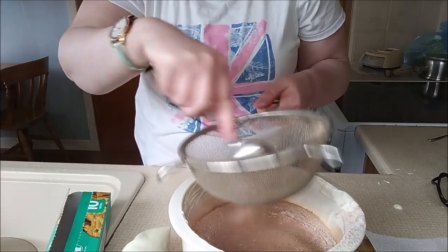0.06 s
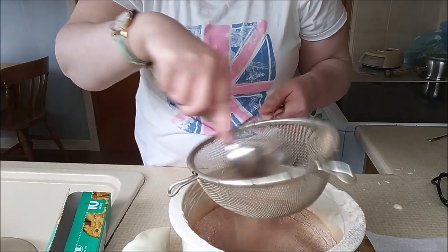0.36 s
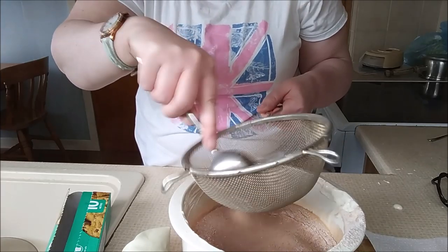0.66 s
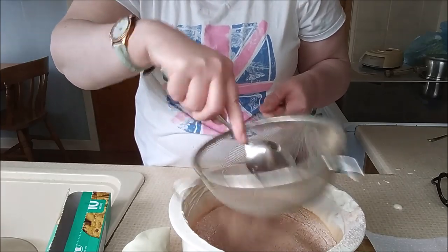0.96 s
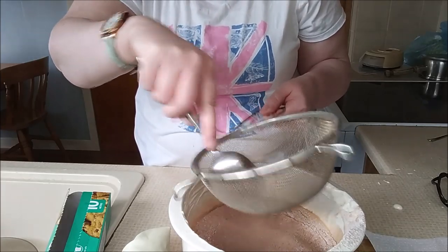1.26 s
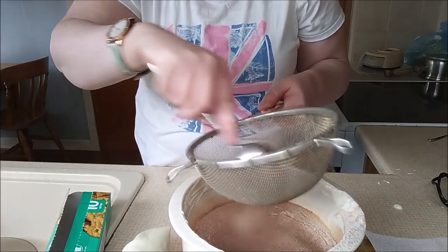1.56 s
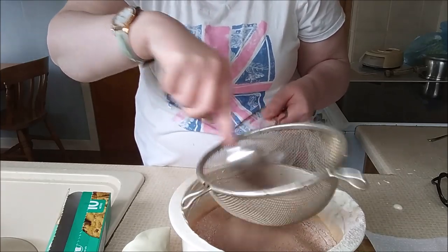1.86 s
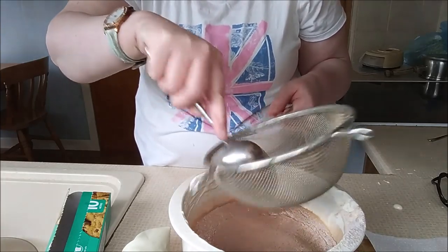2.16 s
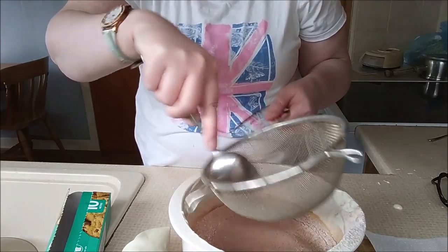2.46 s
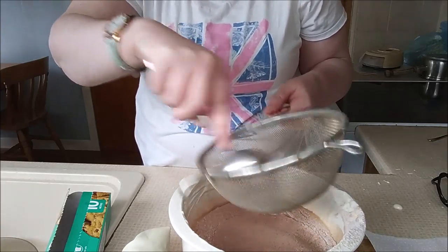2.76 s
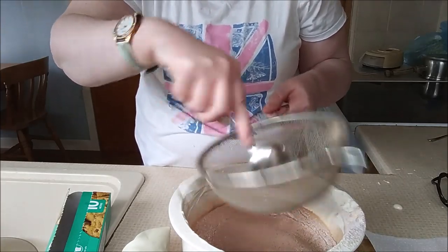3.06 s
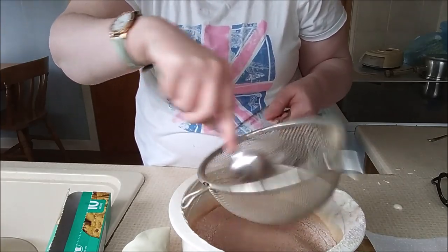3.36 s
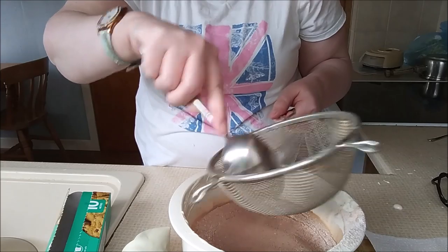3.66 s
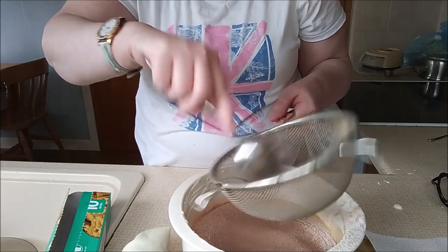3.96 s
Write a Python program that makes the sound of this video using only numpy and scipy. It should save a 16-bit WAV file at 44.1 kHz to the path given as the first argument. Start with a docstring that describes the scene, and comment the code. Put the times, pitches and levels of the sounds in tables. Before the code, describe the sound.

A metal spoon scrapes back and forth in a wire sieve, about nine strokes a second, each a bright rasp with a high ring. Near 2.1 seconds it rests with light touches, then resumes at 2.4. It stops at 3.6 with small clinks, and one last stroke comes at 3.9. The small kitchen adds a short echo, over a faint low electrical hum.

```python
"""A metal spoon rubs to and fro in a wire sieve over a bowl, about nine strokes a second. Its edge trips
over the wires: dense clicks rasp in the mesh, flex the basket and make the spoon ring. Near 2.1 s it rests
briefly, with light touches; the strokes resume at 2.4 s, rest again at 3.6 s, and one last comes at 3.9 s.
Throughout, a small kitchen answers, over a low mains hum and still air."""
import sys
import numpy as np
from scipy import signal
from scipy.fft import rfft, irfft, next_fast_len
from scipy.io import wavfile

SR = 44100
rng = np.random.default_rng(int(sys.argv[2]) if len(sys.argv) > 2 else 0)


def to_wav(sig):
    """Store sig (one row per channel, or 1-D mono) as 16-bit WAV at the path in sys.argv[1].

    Samples outside -1..1 are clipped; the rate is SR.
    """
    pcm = np.clip(np.atleast_2d(sig), -1, 1) * 32767
    pcm = np.round(pcm).astype(np.int16)
    wavfile.write(sys.argv[1], SR, pcm.T)  # frames by channels


N = 176400

RELEASE_S, OVERRUN_S = .04, .01  # the spoon slows and slides on a little
TOP_BACK_DB, TOP_FORWARD_DB = -50.5, -56  # the spoon's highest rings
# Each row: start, length and attack in seconds, way (back or forward), levels in dB of basket, frame,
# mesh, spoon's main ring and its upper rings, basket's note in Hz.
STROKES = [ (0, 0.059, 0.01, "back", -79, -56, -44, -51, -48, 1255),
           (0.092, 0.096, 0.041, "forward", -69, -50, -43.5, -42.5, -51.5, 1194),
           (.213, 0.085, 0.033, "back", -82, -57, -45.5, -45.5, -55, 888),
           (0.326, 0.076, 0.036, "forward", -64.5, -48, -41.5, -46, -52, 1132),
           (0.442, 0.079, 0.046, "back", -66, -54.5, -44, -43, -53.5, 1127),
           (0.54, 0.072, 0.041, "forward", -66.5, -47, -43, -41, -50, 1270),
           (0.66, 0.069, .048, "back", -68.5, -50, -43.5, -39, -51, 1354),
           (0.756, .082, 0.041, "forward", -63, -48.5, -43, -48.5, -51, 917),
           (0.874, .074, 0.033, "back", -69, -50, -43, -43.5, -60, 883),
           (0.972, 0.088, 0.039, "forward", -57, -47, -40.5, -41.5, -52, 1144),
           (1.091, 0.065, .038, "back", -69.5, -54.5, -44, -43, -51, 1107),
           (1.175, 0.083, 0.029, "forward", -61.5, -50.5, -42.5, -40.5, -57, 1324),
           (1.298, 0.065, 0.039, "back", -66, -53, -42.5, -46.5, -49, 1094),
           (1.395, 0.08, 0.038, "forward", -60.5, -47.5, -43, -46, -60, 1129),
           (1.51, 0.072, 0.042, "back", -67, -54, -45, -43.5, -61, 1054),
           (1.613, 0.085, 0.022, "forward", -54.5, -45.5, -41.5, -41.5, -48, 1130),
           (1.734, 0.062, 0.038, "back", -62.5, -52.5, -42.5, -43.5, -48.5, 1145),
           (1.833, 0.073, .017, "forward", -53.5, -45, -41, -45, -48, 1128),
           (1.955, 0.06, 0.047, "back", -63, -52, -44, -37, -46, 1203),
           (2.044, 0.07, 0.018, "forward", -52.5, -44.5, -40.5, -37, -40, 1195),
           (2.375, 0.087, 0.063, "forward", -61, -50.5, -44.5, -43, -48.5, 865),
           (2.502, .095, 0.04, "back", -75, -56, -44.5, -54.5, -53, 980),
           (2.616, 0.088, 0.041, "forward", -54, -44.5, -42, -42, -47.5, 1150),
           (2.75, 0.075, 0.067, "back", -68, -55.5, -44, -43, -48, 1125),
           (2.852, 0.098, 0.034, "forward", -57.5, -45, -42, -42.5, -47.5, 1140),
           (2.975, 0.075, 0.074, "back", -60.5, -52, -40.5, -45, -46, 1422),
           (3.088, 0.096, 0.029, "forward", -51, -43.5, -39, -46, -47, 1184),
           (3.22, 0.056, 0.042, "back", -60, -49, -40.5, -37.5, -48.5, 1212),
           (3.315, 0.087, 0.036, "forward", -54.5, -46, -40.5, -48, -49, 1195),
           (3.446, 0.061, 0.034, "back", -63.5, -49.5, -43.5, -42, -58, 1172),
           (3.517, 0.081, 0.021, "forward", -61.5, -51, -45.5, -39.5, -51, 1078),
           (3.919, 0.049, 0.0052, "forward", -67.5, -54, -45.5, -63, -68, 1230)]
def strokes():
    """Each stroke drives basket, frame, mesh and spoon with the same clicks."""
    out = np.zeros(N)
    for start, length, attack, way, basket_db, frame_db, mesh_db, main_db, upper_db, note_hz in STROKES:
        force = scrape(length + OVERRUN_S, attack, RELEASE_S)
        room = kitchen()
        parts = basket(force, attack, basket_db, note_hz) + [
            (frame(force), frame_db),
            (mesh(force), mesh_db),
            (spoon(force, way, "main"), main_db),
            (spoon(force, way, "upper"), upper_db),
            (spoon(force, way, "top"), TOP_FORWARD_DB if way == "forward" else TOP_BACK_DB)]
        add(out, start, sum(in_room(part, room, length, db) for part, db in parts))
    return out


WIRES_PER_S, SPACING_JITTER, CATCH_SCATTER_DB = 980, .45, 2.5  # nominal rate at full speed
CHATTER_PER_S, CHATTER_DB, RUB_DB = 140, 2.5, -14
def scrape(length, attack, release, size=11000, count=512):
    """Contact force: a click per wire crossed, faster and harder mid-stroke, over smooth friction."""
    t = np.arange(size) / SR
    ramp = np.minimum(t / attack, (length - t) / release)
    speed = np.sin(np.pi / 2 * np.clip(ramp, 0, 1))
    spacing, catch, pressure = rng.standard_normal((3, count))
    travel = np.cumsum(np.sqrt(speed)) * WIRES_PER_S / SR
    wires = np.cumsum(np.exp(SPACING_JITTER * spacing))
    crossings = np.searchsorted(travel, wires)
    clicks = np.bincount(crossings, undb(CATCH_SCATTER_DB * catch), size + 1)[:size]
    chatter = undb(CHATTER_DB * np.interp(t * CHATTER_PER_S, np.arange(count), pressure))
    rub = undb(RUB_DB) * rng.standard_normal(size)
    return (clicks + rub) * speed * chatter


# Spectrum of the fine wires. Each row: frequency in Hz, gain in dB.
MESH_SPECTRUM = [(3300, -30), (3750, -13), (4150, -3), (4650, -8), (5000, -2.5), (5900, 0), (7000, -5.5),
                 (8100, -9), (8600, -4), (9800, -15), (11800, -24), (15800, -23)]
def mesh(force, size=96):
    """The fine wires scatter each click over a few milliseconds into a bright tick."""
    scatter = irfft(np.exp(2j * np.pi * rng.random(size // 2 + 1)))
    ticks = signal.fftconvolve(force, scatter)[:len(force)]
    return colour(ticks, MESH_SPECTRUM)


MODE_SCATTER = .0015
# The modes of the spoon and of the sieve's rim (group "free"). Each row: frequency in Hz, T60 in seconds,
# relative level in dB going back, # the same going forward, group.
SPOON_AND_RIM_MODES = [ (5145, .07, -11, -11, "main"), (5200, .17, 0, 0, "main"), (5305, .1, -13, -13, "main"),
                       (6535, .09, 0, 0, "upper"), (8980, .11, -4, -7, "upper"), (10120, .05, -15, -11, "upper"),
                       (13260, .03, -13, -2, "top"), (13760, .04, -4, -7, "top"), (15060, .06, -16, 0, "top"),
                       (15525, .05, 0, -3, "top"), (2740, .08, -2, -2, "free"), (3470, .08, 0, 0, "free")]
def spoon(force, way, group):
    """One group of modes, of the spoon or the sieve's rim, rings; they shift a little with the point of
    contact."""
    out = 0
    for hz, t60, back_db, forward_db, member in SPOON_AND_RIM_MODES:
        if member == group:
            ring = mode(force, hz * (1 + MODE_SCATTER * rng.standard_normal()), t60)
            out = out + level(ring, forward_db if way == "forward" else back_db)
    return out


# Spectrum of the wire frame and taut mesh near it. Each row: frequency in Hz, gain in dB.
FRAME_SPECTRUM = [(1750, -44.5), (1980, -20), (2450, -23), (2800, -17), (3280, -10), (3480, -8.5),
                  (3700, -30.5)]
def frame(force):
    """The wire frame rings briefly under the clicks."""
    return dense_ring(force, FRAME_SPECTRUM, t60=.032)


BASKET_T60_S, USUAL_BASKET_DB, RUSTLE_DB = .065, -62, -4
THUD_HZ, THUD_HZ_PER_DB, THUD_DB, THUD_SCATTER = 338.1, 4.5, -7.5, .0563
NOTE_DB, NOTE_DB_PER_DB, NOTE_WIDTH_S, NOTE_GLIDE_PER_S = -64.5, .7, .0144, 1.73
# Spectrum of the sagging basket. Each row: frequency in Hz, gain in dB.
BASKET_SPECTRUM = [(150, -25.5), (250, -15), (375, 5), (460, -3), (590, -41), (700, -9.5), (850, -6),
                   (1150, -2), (1400, -2.5), (1720, -19), (2000, -37)]
def basket(force, attack, db, note_hz):
    """The flexing basket as (sound, dB) parts: a broad rustle, a low thud and a short rising note."""
    effort_db = db - USUAL_BASKET_DB
    thud_hz = THUD_HZ + THUD_HZ_PER_DB * effort_db  # pressure tightens the mesh
    thud = mode(force, thud_hz * (1 + THUD_SCATTER * rng.standard_normal()), BASKET_T60_S)
    t = np.arange(len(force)) / SR - attack  # zero at the end of the attack
    glide = 1 + NOTE_GLIDE_PER_S * np.clip(t, -2 * NOTE_WIDTH_S, 2 * NOTE_WIDTH_S)
    push = force * np.exp(-(t / NOTE_WIDTH_S) ** 2)
    note = mode(push, note_hz * glide, BASKET_T60_S, sing=.2)
    rustle = dense_ring(force, BASKET_SPECTRUM, BASKET_T60_S)
    return [(rustle, db + RUSTLE_DB), (thud, db + THUD_DB), (note, NOTE_DB + NOTE_DB_PER_DB * effort_db)]


SKIRT_HZ = 700
def mode(force, hz, t60, sing=.045):
    """One resonance, free to glide; a share of the friction, sing, pushes in step with its swing."""
    turn = np.exp(2j * np.pi * np.cumsum(hz * np.ones(len(force))) / SR)
    pole = np.exp(-np.log(1000) / t60 / SR)
    skirt_pole = pole * np.exp(-np.pi * SKIRT_HZ / SR)
    drive = force / turn + sing * np.abs(force)
    swing = signal.lfilter([1], np.poly([pole, skirt_pole]), drive)
    return (swing * turn).imag


def dense_ring(force, spectrum, t60):
    """A part of the sieve rings in many modes, differently at each place of contact."""
    response = colour(dense_decay(t60), spectrum)
    return signal.fftconvolve(force, response)[:len(force)]


# Light touches of spoon on mesh. Each row: start and length in seconds, levels in dB of mesh,
# spoon's main ring and clink.
TOUCHES = [(2.128, 0.044, -68, -43.5, -58), (2.246, 0.012, -53.5, -57, -89), (2.283, .1, -66.5, -80, -87),
           (2.776, .025, -61, -36, -56), (3.621, 0.033, -63, -47, -74), (3.682, 0.021, -48, -50, -55.5),
           (3.692, 0.0048, -40.5, -63, -48), (3.962, 0.028, -63, -54, -66)]
def touches():
    """The spoon grazes the mesh and clinks, too lightly to flex the basket."""
    out = np.zeros(N)
    for start, length, mesh_db, main_db, clink_db in TOUCHES:
        force = scrape(length, attack=length / 3, release=length / 2)
        room = kitchen()
        parts = [
            (mesh(force), mesh_db),
            (spoon(force, "back", "free"), clink_db),
            (spoon(force, "back", "main"), main_db),
            (spoon(force, "back", "upper"), mesh_db - 3),
            (spoon(force, "back", "top"), mesh_db - 9)]
        add(out, start, sum(in_room(part, room, length, db) for part, db in parts))
    return out


# Spells of unbroken contact. Each row: start in seconds, length in seconds, level in dB.
DRAGS = [(0, 2.12, -54.5), (2.386, 1.23, -53)]
def drag():
    """The working spoon never quite leaves the mesh: a light rasp lasts through the turns of the hand."""
    out = np.zeros(N)
    for start, length, db in DRAGS:
        force = scrape(length, RELEASE_S, RELEASE_S, size=N, count=4096)
        add(out, start, in_room(mesh(force), kitchen(), length, db))
    return out


ROOM_T60_S, ROOM_DB, ROOM_DELAY_S = .37, -6.5, .0053
def kitchen():
    """Room response: the direct sound and a short bright tail, new for each place of the spoon."""
    tail = dense_decay(ROOM_T60_S, size=16000)
    tail = colour(tail, [(1200, -1.5), (3000, 2), (7000, -1.5), (16000, -3.5)])
    return np.r_[1, np.zeros(int(ROOM_DELAY_S * SR)), undb(ROOM_DB) * tail]


def in_room(x, room, length, db):
    """A sound in the room; db is the level of its energy spread over length seconds."""
    wet = signal.fftconvolve(x, room)
    return level(wet, db) * np.sqrt(length * SR / len(wet))


def mains_hum(hz=100.4, db=-70):
    """The mains hums on one steady low tone."""
    return level(np.sin(2 * np.pi * hz * np.arange(N) / SR), db)


def still_air(db=-73):
    """Kitchen air: faint noise, strongest in the bass."""
    hz_db = [(20, -26), (40, 2.5), (150, -5.5), (300, -6.5),
             (600, -21), (950, -15.5), (1700, -24), (15000, -29.5)]
    return level(colour(rng.standard_normal(N), hz_db), db)


def dense_decay(t60, size=4096):
    """Countless close modes dying away together, with unit energy."""
    envelope = np.exp(-np.log(1000) * np.arange(size) / SR / t60)
    ring = rng.standard_normal(size) * envelope
    return ring / np.sqrt(np.sum(ring ** 2))


def colour(x, points):
    """Minimum-phase filter through (Hz, dB) points, falling away outside them."""
    size = next_fast_len(len(x) + 4096)
    size += size % 2
    hz, db = np.array(points, float).T
    log_hz = np.log(np.maximum(np.arange(size // 2 + 1) * SR / size, 1))
    outside = np.maximum(np.log(hz[0]) - log_hz, 0) + np.maximum(log_hz - np.log(hz[-1]), 0)
    gain_db = np.interp(log_hz, np.log(hz), db) - 20 * np.minimum(outside, 2)
    cepstrum = irfft(np.log(undb(gain_db)))
    cepstrum[1:size // 2] *= 2
    cepstrum[size // 2 + 1:] = 0
    return irfft(rfft(x, size) * np.exp(rfft(cepstrum)))[:len(x)]


def undb(db):
    """Decibels to gain."""
    return 10 ** (np.asarray(db) / 20)


def level(x, db):
    """Scale to an rms level."""
    return x * undb(db) / np.sqrt(np.mean(x ** 2))


def add(out, start, x):
    """Mix x in at start seconds."""
    i = max(int(start * SR), 0)
    out[i:i + len(x)] += x[:max(N - i, 0)]


def scene():
    """The sieving in the kitchen, heard from one point."""
    return (strokes() + touches() + drag() + mains_hum() + still_air())[None]


CUT_HZ = 15750
def record(dry):
    """A steep low-pass cuts the top."""
    return signal.sosfilt(signal.ellip(10, .2, 80, CUT_HZ, fs=SR, output="sos"), dry)


dry = scene()
out = record(dry)
to_wav(out)
```